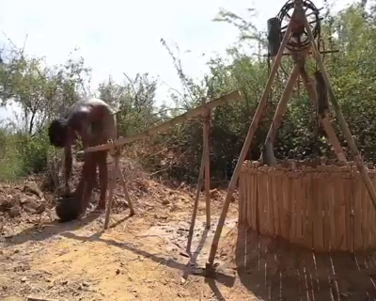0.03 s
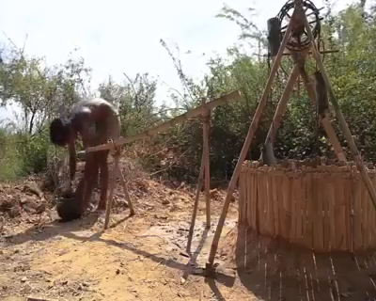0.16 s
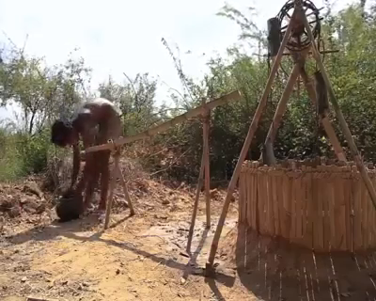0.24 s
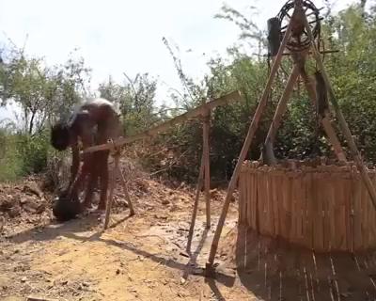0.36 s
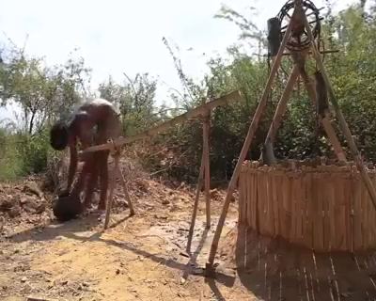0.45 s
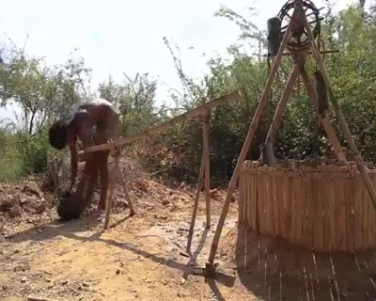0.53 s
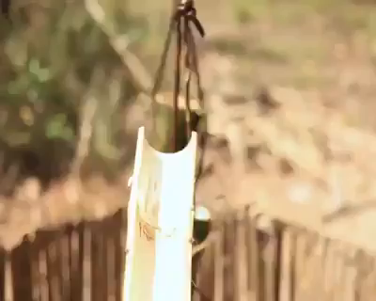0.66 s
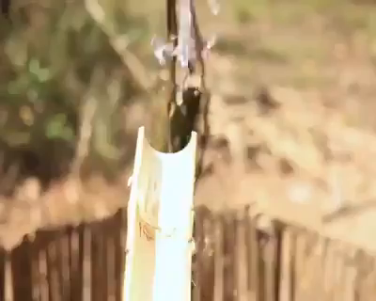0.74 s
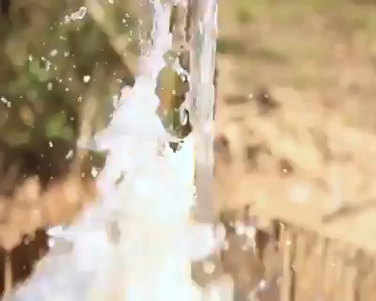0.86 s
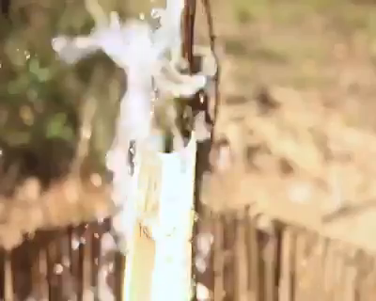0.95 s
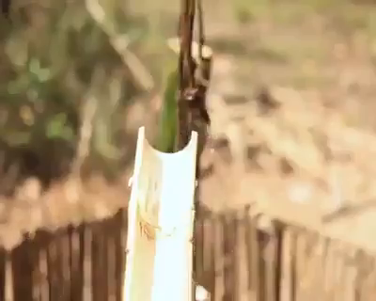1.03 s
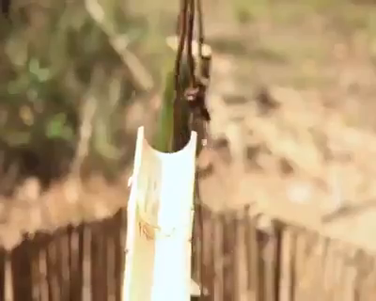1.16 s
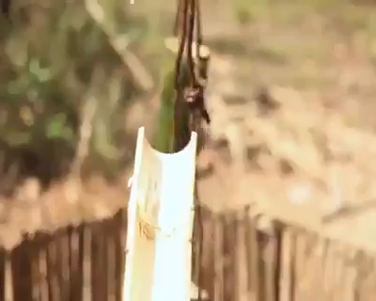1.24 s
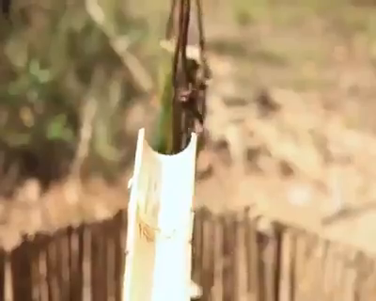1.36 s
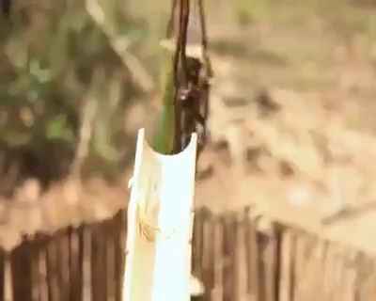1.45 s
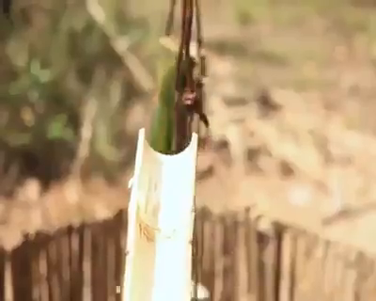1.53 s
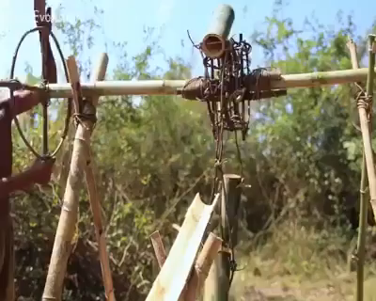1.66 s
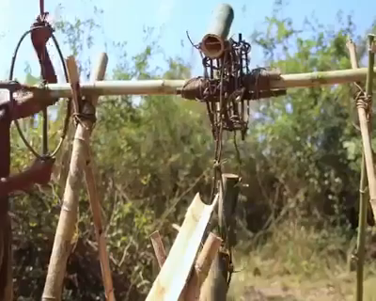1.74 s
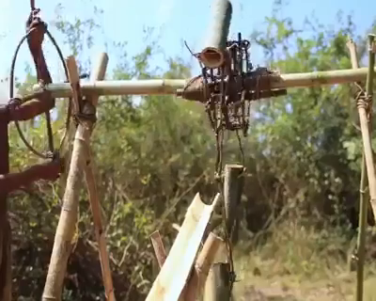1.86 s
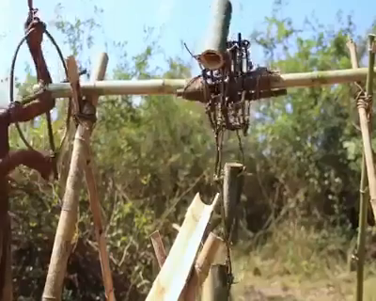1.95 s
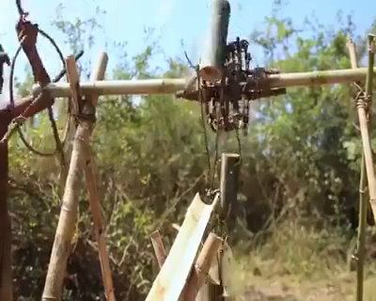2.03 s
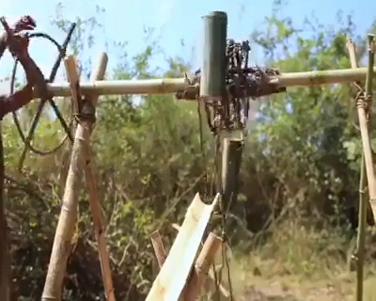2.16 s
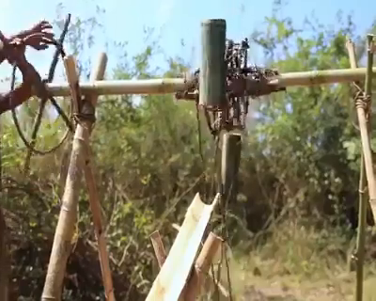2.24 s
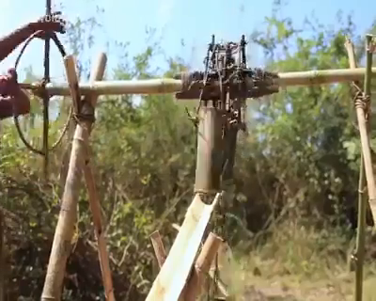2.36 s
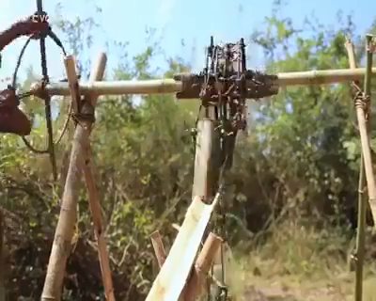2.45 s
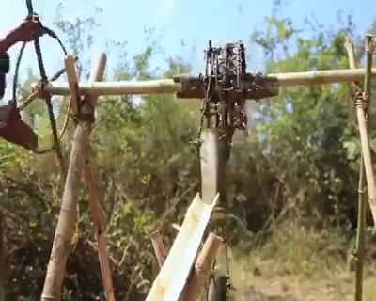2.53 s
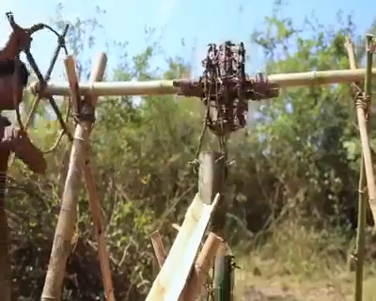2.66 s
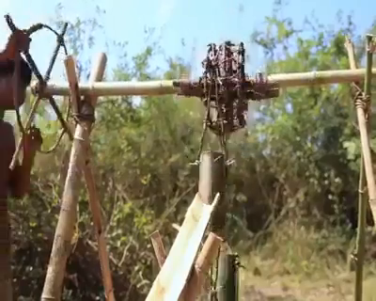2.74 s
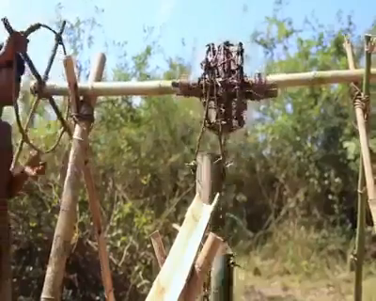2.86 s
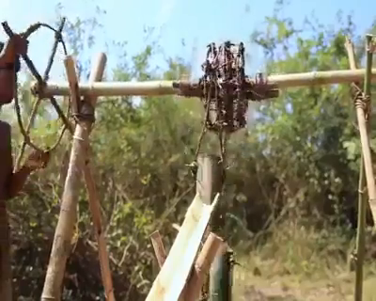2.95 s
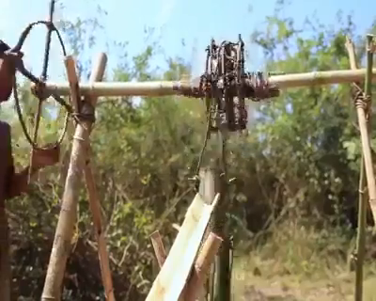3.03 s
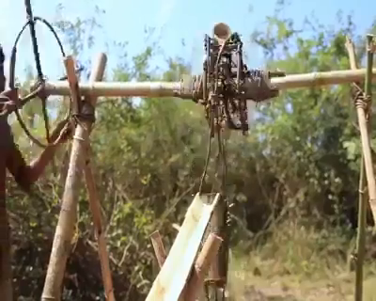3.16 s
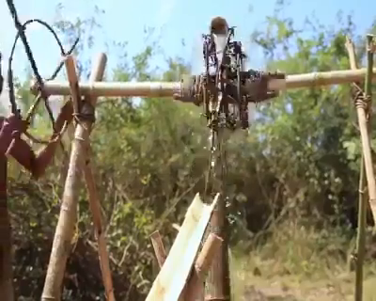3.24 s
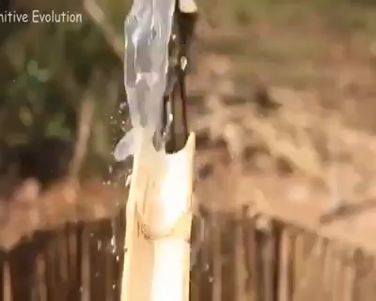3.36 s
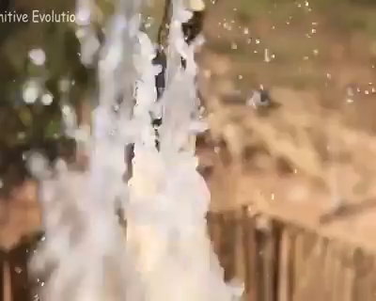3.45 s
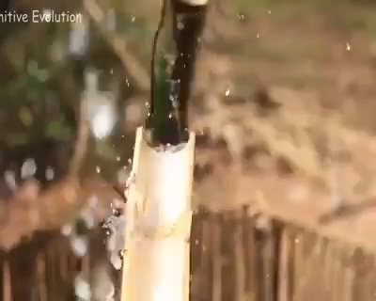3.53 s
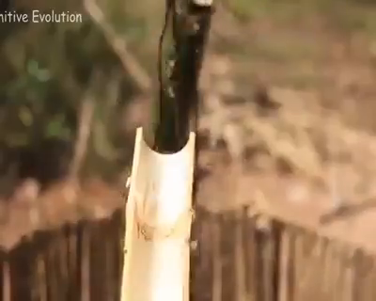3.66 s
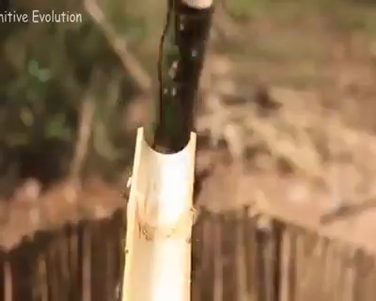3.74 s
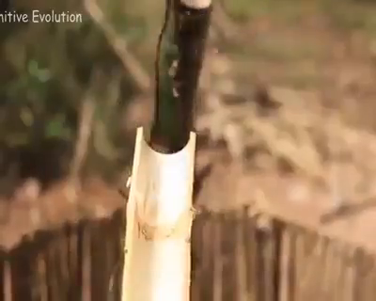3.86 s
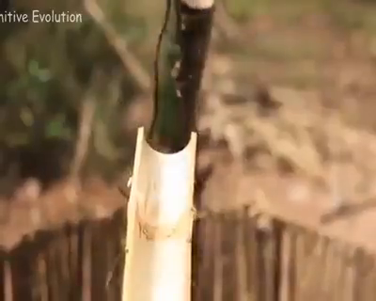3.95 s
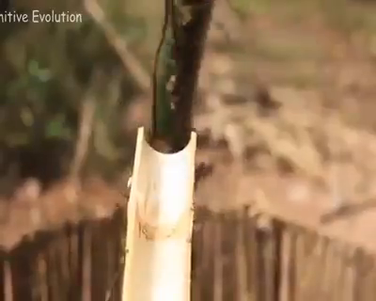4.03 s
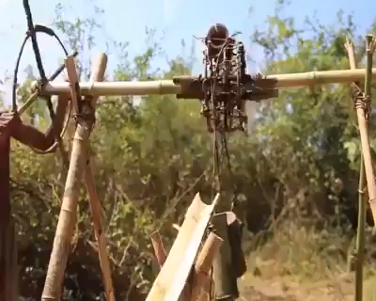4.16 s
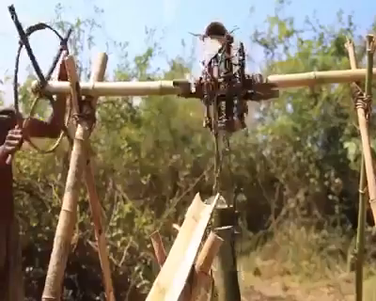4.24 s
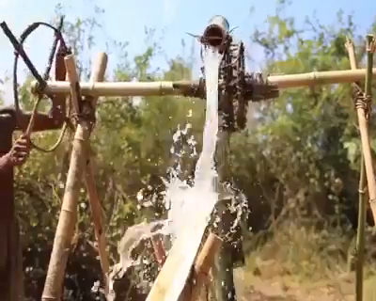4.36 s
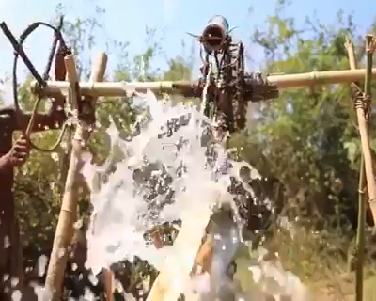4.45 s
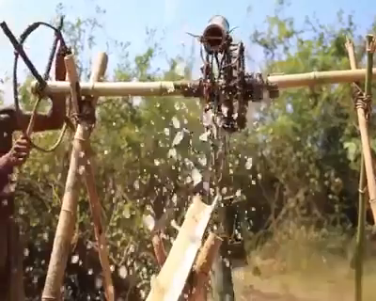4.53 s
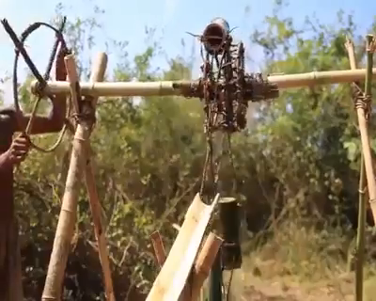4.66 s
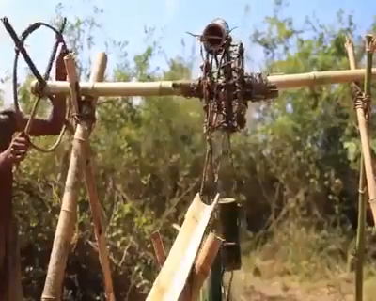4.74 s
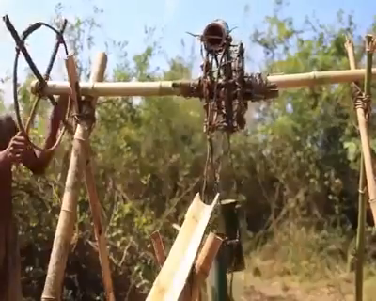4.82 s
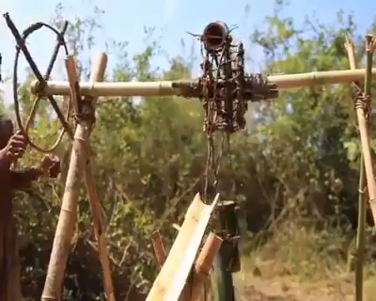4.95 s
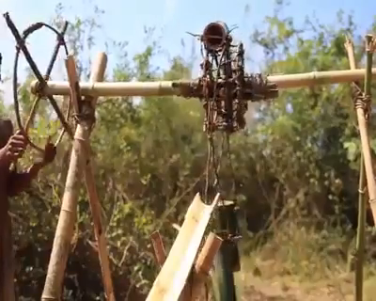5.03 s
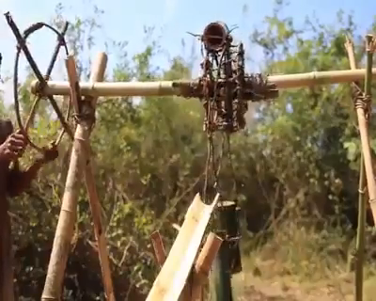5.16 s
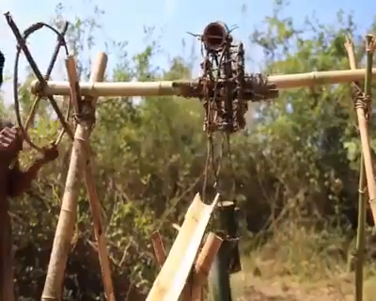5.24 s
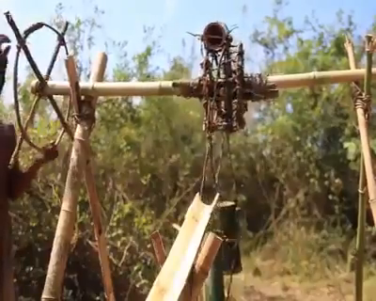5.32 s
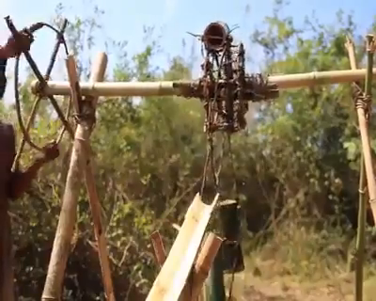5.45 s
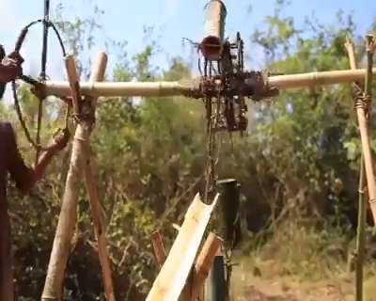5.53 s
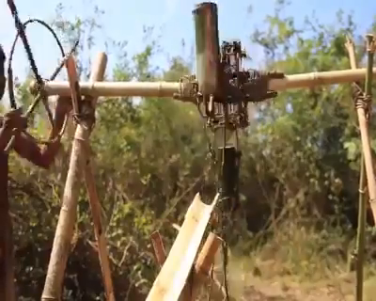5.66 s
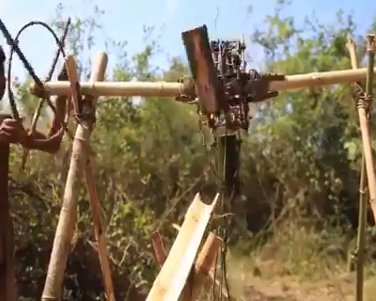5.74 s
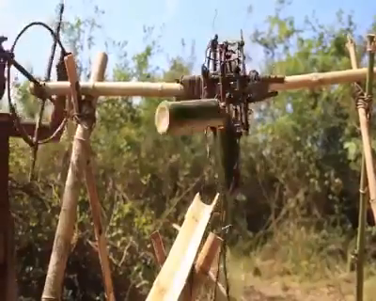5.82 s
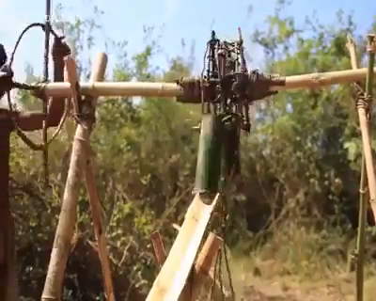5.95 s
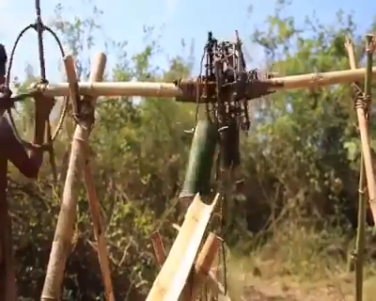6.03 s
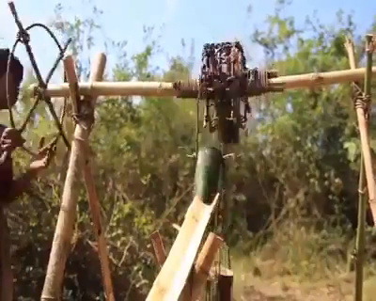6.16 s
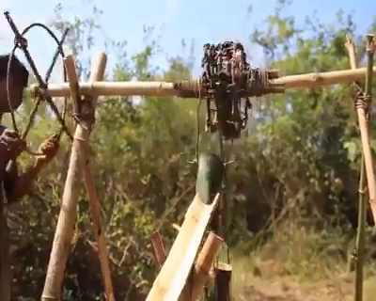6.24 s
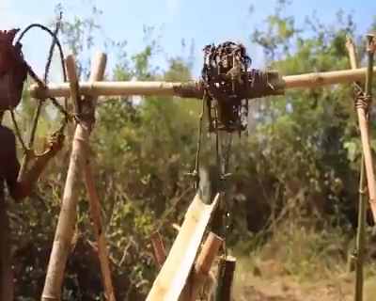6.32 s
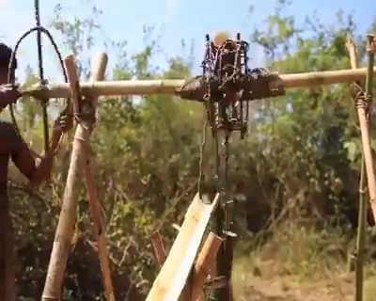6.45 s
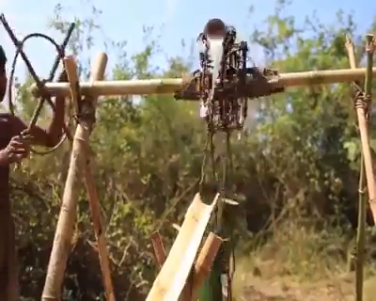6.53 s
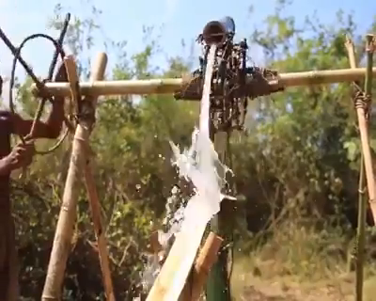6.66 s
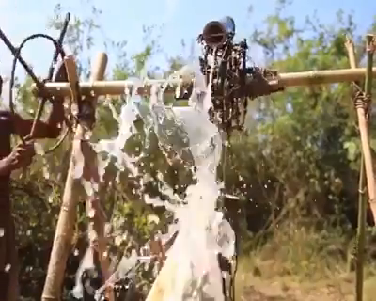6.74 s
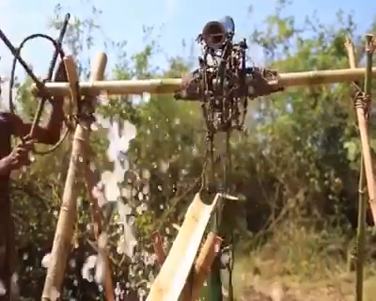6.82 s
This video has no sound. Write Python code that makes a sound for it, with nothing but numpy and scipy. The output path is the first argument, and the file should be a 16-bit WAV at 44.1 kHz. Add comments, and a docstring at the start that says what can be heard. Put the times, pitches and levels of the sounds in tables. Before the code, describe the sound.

Outdoors, over a very faint bush hiss, rope lashings creak in quick dry rasps on a bamboo wheel. Bucketloads then burst into a split-bamboo trough with bright spray, woody patter and hollow low thumps. Creaks and dripping fill the pauses; harder splashes follow mid-way, then a quiet spell and a final heavy gush. Close, dry, single-channel microphone.

```python
"""Bamboo bucket chain and trough

A hand-cranked chain of bamboo buckets tips water into a split-bamboo trough, out of doors. Loads burst into
spray (coloured droplet noise and pings), patter on bamboo (resonant noise) and boom in the hollow trough (noise
and gulps). Splats, thumps and gliding bubbles are timed transients; struck or rubbed modes make the knocks and
creaks, decaying sines the squeaks, and band-limited noise the hiss of the bush and a low bass rumble and throb
that swell and fade through the scene."""
import sys
import numpy as np
from scipy import signal
from scipy.io import wavfile

SR = 44100
rng = np.random.default_rng(int(sys.argv[2]) if len(sys.argv) > 2 else 0)


def transcribe(u):
    """Save the signal u as a 16-bit wav file named by the first command-line argument.

    u: samples, shape (n,) or (channels, n), limited to [-1, 1]; the rate is SR.
    q: integer samples, one column per channel.
    """
    v = np.clip(np.atleast_2d(u).T, -1, 1)
    q = np.round(v * 32767).astype(np.int16)
    wavfile.write(sys.argv[1], SR, q)


N = 303849

# Spectrum of the bush's hiss. Columns: f/Hz, relative level per hertz/dB
BUSH_SPECTRUM = [(100, -17), (160, -3.5), (400, -14.5), (717, -8.5), (1080, -10.5), (1960, -11.5),
                 (3540, -16), (6000, -43.5), (8820, -16), (13500, -21), (16300, -20)]
BUSH_DB = -66.5
# Low bass rumble and throb, swelling and fading through the scene. Columns: t/s, rumble level/dB, throb
# level/dB
LOW_BASS_LEVELS = [(0.0, -55, -57), (0.13, -67, -69), (0.42, -53.5, -60), (0.92, -71, -62),
                   (1.42, -67, -59), (1.61, -66, -52), (1.73, -74, -72.5), (3.26, -79, -83),
                   (3.59, -49, -49), (3.75, -84, -55), (3.82, -52, -50), (3.95, -77, -57.5),
                   (4.14, -60, -49), (4.2, -81, -71), (4.44, -89, -86.5), (4.59, -65.5, -71.5),
                   (4.66, -76, -71), (6.31, -70, -72), (6.41, -54, -55.5), (6.72, -99, -77),
                   (6.89, -52, -55)]
# Creaks of the rope lashings. Columns: t/s, strength level/dB, length/s, rubbed pitch f/Hz
CREAK_EVENTS = [(.01, -41, 0.025, 3250), (0.142, -44.5, 0.032, 3080), (0.186, -38, 0.039, 3190),
                (0.224, -41, 0.057, 3120), (0.322, -37, 0.064, 3160), (0.381, -35, 0.038, 3200),
                (0.413, -32, 0.038, 3500), (0.505, -27, 0.058, 3340), (0.642, -41.5, 0.027, 3270),
                (1.789, -38.5, 0.029, 3000), (1.845, -25.5, 0.0047, 3390), (1.929, -33, 0.048, 3200),
                (1.993, -38, 0.087, 2600), (2.084, -37.5, 0.069, 2600), (3.344, -33, 0.0088, 2620),
                (3.371, -33, 0.073, 3200), (3.429, -27, 0.016, 3790), (3.959, -31.5, 0.01, 3210),
                (4.189, -34.5, 0.028, 3350), (4.243, -35, 0.008, 3640), (4.296, -44, 0.033, 2900),
                (4.319, -35.5, 0.043, 2700), (4.796, -40.5, 0.029, 3200), (4.832, -37, 0.061, 3200),
                (4.892, -42.5, 0.057, 3000), (4.932, -39, 0.025, 3260), (4.983, -37, 0.088, 3100)]
# Modes of the lashed wheel's spokes. Columns: f/Hz, relative level/dB, t60/s
SPOKE_MODES = [(2490, 0, 0.017), (2730, 5.5, 0.018), (2995, -10.5, 0.081), (3200, 3, 0.0053),
               (3606, 4.5, 0.015), (4080, 9.5, 0.035)]
# Rubbed bamboo singing on one note. Columns: t/s, level/dB, f/Hz, rubbing time/s, t60/s
SQUEAK_EVENTS = [(0.522, -40.5, 2995, 0.027, 0.12), (3.392, -39.5, 3310, 0.0085, 0.031),
                 (4.275, -43.5, 3230, .004, .07), (5.788, -56, 1076, 0.01, 0.092),
                 (5.83, -65.5, 1075, 0.061, 0.29)]
# Buckets knocking and rubbing together. Columns: t/s, strength level/dB, contact length/s
KNOCK_EVENTS = [(2.412, -55, 0.0051), (2.441, -45, 0.023), (2.466, -54.5, 0.12), (2.605, -51.5, 0.025),
                (3.33, -25, 0.015), (3.393, -47, 0.039), (4.2314, -35, 0.0069)]
# Modes of a hollow bucket. Columns: f/Hz, relative level/dB, t60/s
BUCKET_MODES = [(1096, 1.5, 0.15), (1106, -12, 0.24), (880, -8, 0.053), (1410, 5, 0.0073),
                (1790, -15.5, 0.091), (2270, -11, 0.019)]
# Knocks above this strength favour the higher modes
HARD_KNOCK_DB, BRIGHTER_DB_PER_OCTAVE_PER_DB = -52, 0.18

# Dribble beneath the loads. Columns: t/s, spray level/dB, patter level/dB, trough level/dB
DRIBBLE_LEVELS = [(0.0, -65, -64, -73), (0.69, -65.5, -62.5, -67.5), (1.2, -52, -56.5, -59.5),
                  (1.75, -58.5, -62, -62.5), (2.4, -63.5, -69, -67), (2.95, -62.5, -70.5, -69.5),
                  (3.4, -59.5, -66.5, -68), (4.75, -88, -64, -60), (5.13, -62, -70, -64),
                  (5.22, -73, -68.5, -66.5), (6.0, -60, -67, -69), (6.432, -71, -70, -67),
                  (6.89, -55, -49.5, -51.5)]
# Sheets spilling from the buckets.
# Columns: t/s of full strength, swell before it/s, hold/s, spray level/dB, patter level/dB
SHEET_SURGES = [(0.423, 0.04, 0.0074, -54.5, -57), (0.517, 0.011, 0.017, -49, -50.5),
                (0.794, 0.17, 0.028, -53, -54.5), (0.888, 0.08, 0.048, -38.5, -44),
                (0.998, 0.064, 0.028, -31, -38.5), (1.046, 0.017, 0.044, -45.5, -45.5),
                (1.12, 0.057, 0.017, -43.5, -54), (1.16, .012, 0.016, -52, -69),
                (1.405, 0.13, 0.073, -36.5, -39.5), (1.508, 0.048, 0.053, -39, -41),
                (1.627, 0.061, 0.036, -45.5, -43), (1.84, 0.39, 0.0039, -49, -82),
                (3.44, 0.0084, 0.074, -32, -40.5), (3.638, 0.38, 0.037, -39, -46),
                (3.726, 0.15, 0.013, -53, -48), (3.979, 1, 0.17, -52, -61), (4.233, 0.51, 0.11, -58, -51.5),
                (4.369, 0.0034, 0.075, -36.5, -49), (4.477, 0.04, 0.082, -42, -47.5),
                (4.593, 0.053, 0.063, -42, -48), (4.705, 0.11, 0.011, -49.5, -47),
                (4.857, 1, 0.0075, -53, -67), (4.965, 0.2, 0.013, -54.5, -84),
                (5.054, 0.036, 0.089, -55, -61.5), (6.459, 0.019, 0.03, -79, -51),
                (6.53, 0.046, 0.068, -59, -54.5), (6.67, 0.1, 0.014, -78, -45.5),
                (6.76, 0.3, 0.026, -33.5, -48), (6.885, 0.02, .02, -42, -45)]
SHEET_SWELL_DB, SHEET_FADE_DB_PER_S = 44.5, 431
# Rushes of water down the trough. Columns: t/s of full strength, swell before it/s, hold/s, level/dB
RUSH_SURGES = [(0.992, 0.31, 0.028, -43.5), (1.36, 0.095, 0.16, -55), (1.497, 0.014, 0.081, -39),
               (1.624, .02, 0.015, -44), (3.308, .012, 0.23, -64.5), (3.452, 0.057, 0.081, -47.5),
               (3.539, 0.029, 0.098, -32), (4.073, 0.021, 0.0039, -48), (4.367, 0.013, 0.07, -55.5),
               (4.546, 0.086, 0.028, -35), (4.62, 0.038, 0.087, -44), (6.5, 0.17, 0.0035, -57.5),
               (6.855, 0.012, .04, -31.5)]
RUSH_SWELL_DB, RUSH_FADE_DB_PER_S = 56, 401
# Resonances of the trough. Columns: f/Hz, width/Hz, relative level/dB
TROUGH_RESONANCES = [(117, 36.3, -15), (167.6, 10.4, 8.5), (267, 50, -12), (343.5, 53, 11), (526, 150, 5),
                     (681.6, 11, 9.5)]
# Colour of patter on bamboo. Columns: f/Hz, width/Hz, relative level/dB
WALL_RESONANCES = [(1000, 300, -1), (1780, 810, 2.5), (2600, 900, 6), (3500, 940, 6), (5660, 3200, -6)]
# Spectrum of the spray. Columns: f/Hz, relative level per hertz/dB
SPRAY_SPECTRUM = [(2350, -12.5), (4000, -11), (5460, -1.5), (6560, -9), (7380, 2.5), (9610, 0.5),
                  (12000, -7.5), (14500, -14.5), (16400, -19)]
# Treble drive of the spray, before a constant is taken off its gain. Columns: t/s, level/dB
TREBLE_DRIVE = [(0, 8.5), (1.0, 7), (2.0, 12.5), (2.7, 0), (3.6, 7.5), (4.05, 13.5), (4.4, 4), (5.0, 21),
                (5.6, -0.5), (6.89, 6.5)]
TREBLE_HZ = 11600

# Large bubbles reaching the surface. Columns: t/s, level/dB, start f/Hz, end f/Hz, length/s
BLOOP_EVENTS = [(6.515, -47.5, 186, 556, 0.031), (6.646, -33.5, 378, 528, 0.018),
                (6.655, -40.5, 1676, 1530, 0.029), (6.663, -43.5, 1190, 1350, 0.017)]
BLOOP_ROUGHNESS = 0.22
# Slugs of water and buckets thumping the trough. Columns: t/s, level/dB, strongest f/Hz, t60/s
THUMP_EVENTS = [(0.937, -34, 375, 0.039), (0.973, -29.5, 862, 0.094), (0.998, -25, 117, 0.16),
                (1.0, -18, 341, 0.072), (1.035, -40.5, 646, 0.24), (1.045, -33, 369, 0.17),
                (1.052, -34.5, 128, 0.19), (1.374, -29, 159, 0.062), (1.499, -21, 410, 0.056),
                (1.516, -22.5, 163, 0.092), (1.546, -23, 514, 0.083), (1.566, -31, 363, 0.075),
                (1.578, -25.5, 552, 0.054), (1.624, -36.5, 550, 0.13), (3.532, -30, 294, 0.077),
                (3.548, -28.5, 369, 0.1), (3.617, -14, 534, 0.034), (3.798, -17.5, 240, 0.042),
                (3.821, -29.5, 164, 0.061), (4.071, -19.5, 261, 0.022), (4.086, -27, 218, 0.039),
                (4.384, -33.5, 517, 0.089), (4.5515, -16.5, 402, 0.024), (4.5785, -6, 603, 0.034),
                (4.569, -24, 547, 0.032), (4.58, -30, 161, 0.13), (4.593, -25, 645, 0.14),
                (4.721, -30.5, 438, 0.053), (5.33, -50.5, 492, .07), (5.518, -49.5, 490, 0.068),
                (5.53, -51.5, 196, 0.09), (5.787, -51, 486, 0.075), (5.965, -49, 494, .05),
                (5.967, -44, 179, 0.12), (6.031, -51.5, 515, .06), (6.531, -34, 780, 0.071),
                (6.859, -16, 622, 0.063), (6.856, -17, 362, 0.035), (6.881, -17, 616, 0.04)]
THUMP_RISE_CYCLES, CHURN_UNDER_THUMP_DB = 0.77, -15.5
# Splats of water on hard bamboo. Columns: t/s, bright spray level/dB, body level around 3 kHz/dB
SPLAT_EVENTS = [(0.925, -44, -33), (1.078, -31, -43), (1.142, -32, -50), (1.4198, -24, -34),
                (1.46, -34, -44), (1.479, -35, -51), (1.527, -30, -41), (1.543, -29, -54),
                (1.636, -34.5, -49), (1.825, -42, -58), (1.844, -39, -42), (1.953, -43, -65),
                (2.001, -42, -79), (2.055, -27.5, -49.5), (2.1202, -34.5, -49), (2.43, -27.5, -43),
                (2.5218, -38, -37), (2.603, -47, -53), (2.804, -40, -39.5), (3.0765, -45.5, -66),
                (3.184, -71, -49), (3.438, -45, -41), (3.523, -50, -26), (3.611, -29, -30),
                (3.7562, -27.5, -39), (3.947, -37, -72), (4.229, -41, -30.5), (4.3693, -21, -47),
                (4.3827, -54, -35), (4.402, -37, -39), (4.432, -26, -40), (4.465, -41, -49),
                (4.602, -28, -59), (4.704, -30.5, -72), (4.965, -49, -65), (5.098, -34, -51.5),
                (5.3252, -72, -40), (5.447, -42, -51.5), (5.6035, -53.5, -51.5), (5.965, -51, -48),
                (6.029, -48.5, -55), (6.5306, -43, -35), (6.545, -58, -36), (6.694, -48, -41.5),
                (6.736, -40, -46), (6.757, -24.5, -34), (6.788, -44, -39), (6.8603, -36, -33.5)]
SPLAT_RISE_S, SPLAT_T60_S, SNAP_OVER_SPRAY_DB = 0.002, 0.029, 7

CUTOFF_HZ = 16450  # stopband edge of the final low-pass


def from_db(db):
    """Logarithmic level: 20 dB is a factor of ten in amplitude."""
    return 10 ** (np.asarray(db) / 20)


def rms_one(x):
    """Normalisation: the signal is scaled to unit root mean square."""
    return x / np.sqrt(np.mean(x ** 2) + 1e-20)


def level(rows):
    """Envelope: gain over time from rows of t/s, level/dB, interpolated in decibels."""
    s, db = np.transpose(rows)
    return from_db(np.interp(np.arange(N) / SR, s, db))


def drift(rate):
    """Low-passed random fluctuation: noise at every 20th sample through two poles at rate/Hz; spread 1."""
    r = np.exp(-2 * np.pi * rate * 20 / SR)
    noise = rng.standard_normal(N // 20 + 2002)
    slow = signal.lfilter([1], [1, -2 * r, r * r], noise)[2000:]  # the onset is discarded
    return np.interp(np.arange(N) / 20, np.arange(len(slow)), rms_one(slow))


def above(x, hz, order):
    """High-pass filtering; a vanishing dither keeps silent stretches fast."""
    dither = np.resize([1e-12, -1e-12], N)
    return signal.sosfilt(signal.butter(order, hz, "high", fs=SR, output="sos"), x + dither)


def band_pass(x, low_hz, high_hz, order=2):
    """Band-pass filtering between two frequencies."""
    return signal.sosfilt(signal.butter(order, [low_hz, high_hz], "band", fs=SR, output="sos"), x)


def ring(clicks, hz, t60):
    """Impulse response of a damped oscillator: a unit click starts a decaying sine of height 1."""
    r, w = from_db(-60 / (t60 * SR)), 2 * np.pi * hz / SR
    return signal.lfilter([0, np.sin(w)], [1, -2 * r * np.cos(w), r * r], clicks + 1e-18)


def resonate(x, peaks):
    """Parallel resonance: two-pole peaks summed with alternating signs; rms 1."""
    out = 0
    for k, (hz, width_hz, db) in enumerate(peaks):
        r = np.exp(-np.pi * width_hz / SR)
        a = [1, -2 * r * np.cos(2 * np.pi * hz / SR), r * r]
        peak = signal.lfilter([(1 - r * r) / 2, 0, (r * r - 1) / 2], a, x)
        out = out + (-1) ** k * from_db(db) * peak
    return rms_one(out)


def coloured(x, spectrum, patchy_db, rate):
    """Spectral shaping: bands of about 0.4 octave, each flickering independently; rms 1."""
    hz, db = np.transpose(spectrum)
    band_count = round(2.5 * np.log2(hz[-1] / hz[0]))
    edges = np.geomspace(hz[0], min(hz[-1], .45 * SR), band_count + 1)
    out = 0
    for k, (low, high) in enumerate(zip(edges, edges[1:])):
        centre_db = np.interp(np.log(low * high) / 2, np.log(hz), db)
        gain = from_db(centre_db + patchy_db * drift(rate))
        out = out + (-1) ** k * gain * band_pass(x, low, high)
    return rms_one(out)


def random_clicks(per_s, spread_db, largest):
    """Poisson-like arrivals: clicks of random sign whose excess level is exponentially distributed."""
    sizes = from_db(spread_db * np.minimum(rng.exponential(1, N), largest)) * rng.choice([-1, 1], N)
    return sizes * (rng.random(N) < per_s / SR)


def droplets(per_s, spread_db, noise_share):
    """Shot noise: random clicks of uneven size on a bed of noise; rms 1."""
    clicks = rms_one(random_clicks(per_s, spread_db, largest=5))
    return rms_one(clicks + noise_share * rng.standard_normal(N))


def bubbles(per_s, low_hz, high_hz, cycles, spread_db, count):
    """Bubble resonance: each collapse rings at one of many pitches, falling 60 dB in some cycles; rms 1."""
    clicks = random_clicks(per_s, spread_db, largest=4)
    dealt = rng.integers(0, count, N)
    pitches = np.geomspace(low_hz, high_hz, count)
    return rms_one(sum(ring(clicks * (dealt == k), hz, cycles / hz) for k, hz in enumerate(pitches)))


def struck(events, modes, strengths_db, slips, rise, first):
    """Modal excitation: a first touch and uneven slips over the contact feed each mode its own share."""
    span = SR // 5
    t, forces = np.arange(span) / SR, np.zeros((len(modes), N + span))
    sizes = rng.standard_normal((len(events), span))
    chances = rng.random((len(events), span))
    for (s, peak_db, length), size, chance, strength_db in zip(events, sizes, chances, strengths_db):
        part = np.clip(t / max(length, .002), 0, 1)
        grip = np.minimum(part / rise, 1) * np.sqrt(1 - part)
        run = size * ((chance < slips / (length * SR)) + 0.11) * grip
        force = run / np.sqrt(np.sum(run ** 2)) + first * (t == 0)
        i = round(s * SR)
        forces[:, i:i + span] += from_db(peak_db + strength_db)[:, None] * force
    return sum(from_db(db) * ring(force[:N], hz, t60) for force, (hz, db, t60) in zip(forces, modes))


def bush():
    """Broadband noise: the hiss of the bush is shaped white noise with flickering bands."""
    noise = rng.standard_normal(N)
    return from_db(BUSH_DB) * coloured(noise, BUSH_SPECTRUM, patchy_db=1.8, rate=20.0)


def low_bass():
    """Narrow-band noise: low bass swells and fades through the scene, as a rumble and a deeper throb."""
    rumble = band_pass(rng.standard_normal(N), 62.0, 118.0)
    throb = band_pass(rng.standard_normal(N), 36.0, 54.0)
    rows = np.array(LOW_BASS_LEVELS)
    lumps = from_db(1.8 * drift(2.9))
    rumbling = level(rows[:, [0, 1]]) * rms_one(lumps * rumble)
    return rumbling + level(rows[:, [0, 2]]) * rms_one(lumps * throb)


def creaks():
    """Stick-slip friction: rope slipping on bamboo rings the spokes, most those near the rubbed pitch."""
    rows, spoke_hz = np.array(CREAK_EVENTS), np.array(SPOKE_MODES)[:, 0]
    detuning = (spoke_hz - rows[:, 3:]) / 455.0
    strengths_db = rng.normal(0, 0.3, (len(rows), len(spoke_hz))) - 10.0 * detuning ** 2
    rung = struck(rows[:, :3], SPOKE_MODES, strengths_db, slips=35.0, rise=0.2, first=0)
    return above(rung, 2340.0, order=4)


def squeaks():
    """Sustained then free vibration: a note trembles while rubbed, then decays cleanly."""
    out, tremble = np.zeros(N), 0.7 * drift(80.0)
    for s, peak_db, hz, rubbed, t60 in SQUEAK_EVENTS:
        i, t = round(s * SR), np.arange(SR // 3) / SR
        swell = np.minimum(t / 0.0025, 1) * (1 + tremble[i:i + len(t)] * (t < rubbed))
        decay = from_db(peak_db - 60 * np.maximum(t - rubbed, 0) / t60)
        out[i:i + len(t)] += swell * decay * np.sin(2 * np.pi * hz * t)
    return out


def knocks():
    """Modal impact: hollow buckets ring near 1.1 kHz without bass; harder knocks favour higher modes."""
    octaves = np.log2(np.array(BUCKET_MODES)[:, 0] / BUCKET_MODES[0][0])
    hardness = np.maximum(np.array(KNOCK_EVENTS)[:, 1:2] - HARD_KNOCK_DB, 0)
    chance_db = rng.normal(0, 1.0, (len(KNOCK_EVENTS), len(BUCKET_MODES)))
    strengths_db = chance_db + BRIGHTER_DB_PER_OCTAVE_PER_DB * hardness * octaves
    rung = struck(KNOCK_EVENTS, BUCKET_MODES, strengths_db, slips=25.0, rise=0.047, first=0.57)
    return above(rung, 880.0, order=4)


def surges(s, swell, hold, db, swell_db, fade_db_per_s):
    """Exponential growth and decay: each surge climbs swell_db, holds, then fades at a steady rate."""
    out = np.zeros(N)
    for full, rise, stay, top_db in zip(s, np.maximum(swell, .002), hold, db):
        i = max(round((full - 3 * rise) * SR), 0)  # the climb begins early enough to start faint
        t = np.arange(i, min(round((full + stay + .5) * SR), N)) / SR - full
        climb_db = swell_db * np.minimum(t / rise, 0)
        fade_db = fade_db_per_s * np.maximum(t - stay, 0)
        out[i:i + len(t)] += from_db(top_db + climb_db - fade_db)
    return out


def flows():
    """Superposition of flow: gains of spray, patter and trough, as surges over the dribble."""
    s, swell, hold, spray_db, patter_db = np.transpose(SHEET_SURGES)
    spray = surges(s, swell, hold, spray_db, SHEET_SWELL_DB, SHEET_FADE_DB_PER_S)
    patter = surges(s, swell, hold, patter_db, SHEET_SWELL_DB, SHEET_FADE_DB_PER_S)
    trough = surges(*np.transpose(RUSH_SURGES), RUSH_SWELL_DB, RUSH_FADE_DB_PER_S)
    rows = np.array(DRIBBLE_LEVELS)
    return [gain + level(rows[:, [0, k]]) for k, gain in enumerate((spray, patter, trough), 1)]


def trough_churn():
    """Cavity resonance: noise through the trough's resonances, with low bubble gulps, band-limited."""
    gulps = bubbles(per_s=140., low_hz=155.3, high_hz=747.0, cycles=26.0, spread_db=3.5, count=8)
    churn = rms_one(resonate(rng.standard_normal(N), TROUGH_RESONANCES) + 0.77 * gulps)
    return band_pass(churn, 118.0, 790.0, order=4)


def wall_body():
    """Forced resonance: droplet impacts take the colour of the bamboo wall."""
    return resonate(droplets(per_s=1200.0, spread_db=3.5, noise_share=0.8), WALL_RESONANCES)


def patter_texture(body):
    """Clustered impacts: wall noise and ringing drops land in uneven flurries."""
    drops = bubbles(per_s=250.0, low_hz=800.0, high_hz=6000., cycles=30.0, spread_db=3.0, count=12)
    flurries = rms_one(from_db(2.5 * drift(45.)))
    return flurries * rms_one(body + 0.35 * drops)


def bright_spray():
    """Shot noise with bubble resonance: coloured droplets and pinging fine drops, with varying treble."""
    grain = droplets(per_s=4000., spread_db=2.5, noise_share=0.8)
    bright = coloured(grain, SPRAY_SPECTRUM, patchy_db=3.5, rate=37.0)
    pings = bubbles(per_s=900.0, low_hz=3000., high_hz=12300.0, cycles=100.0, spread_db=3.5, count=16)
    bright = rms_one(bright + 0.26 * pings)
    high_pass = signal.butter(2, TREBLE_HZ, "high", fs=SR, output="sos")
    treble = signal.sosfiltfilt(high_pass, bright)  # zero phase, so it adds in step
    return bright + (level(TREBLE_DRIVE) - 3.0) * treble


def bloops():
    """Frequency glide: a sine with linearly changing pitch under a rounded, trembling swell."""
    out = np.zeros(N)
    for s, peak_db, start_hz, end_hz, length in BLOOP_EVENTS:
        i, t = round(s * SR), np.arange(round(length * SR)) / SR
        turns = start_hz * t + (end_hz - start_hz) * t ** 2 / (2 * length)
        swell = np.sqrt(np.sin(np.pi * t / length))
        out[i:i + len(t)] += from_db(peak_db) * swell * np.sin(2 * np.pi * turns)
    return out * (1 + BLOOP_ROUGHNESS * drift(180.0))


def thumps(churn):
    """Impulsive cavity excitation: a blow cracks, rings the air under the slug and shakes the churn."""
    slugs, shaken = np.zeros(N), np.zeros(N)
    for s, peak_db, hz, t60 in THUMP_EVENTS:
        i = round(s * SR)
        t = np.arange(min(N - i, SR // 3)) / SR
        blow = from_db(peak_db) * (1 - np.exp(-(t * hz / THUMP_RISE_CYCLES) ** 2))
        tone = np.sin(2 * np.pi * hz * t) * from_db(-60 * t / t60)
        # the shorter the ring, the harder the crack
        crack = 0.027 / t60 * np.sin(2 * np.pi * 1.926 * hz * t) * np.exp(-t / 0.0016)
        slugs[i:i + len(t)] += blow * (tone + crack)
        shaken[i:i + len(t)] += blow * from_db(CHURN_UNDER_THUMP_DB - 60 * t / (1.15 * t60))
    return above(slugs, 67.0, order=3) + shaken * churn


def splats(bright, body):
    """Impact transient: a snap near the onset, with spray and wall noise rising at once and dying fast."""
    high, low, snaps = np.zeros(N), np.zeros(N), np.zeros((2, N))
    for s, peak_db, body_db in SPLAT_EVENTS:
        i = round(s * SR)
        t = np.arange(min(N - i, SR // 4)) / SR
        fall = np.minimum(t / SPLAT_RISE_S, 1) * from_db(-60 * t / SPLAT_T60_S)
        # each noise is levelled by its own spread over the first 20 ms
        high[i:i + len(t)] += from_db(peak_db) / bright[i:i + SR // 50].std() * fall
        low[i:i + len(t)] += from_db(body_db) / body[i:i + SR // 50].std() * fall
        snaps[:, i + round(.001 * SR)] = from_db(np.add([peak_db, body_db], SNAP_OVER_SPRAY_DB))
    snapping = ring(snaps[0], 9600.0, 0.00115) + ring(snaps[1], 3370.0, 0.0024)
    return high * bright + low * body + snapping


def scene():
    """Superposition: bush, low bass, bamboo and water add in one channel."""
    background = bush() + low_bass()
    bamboo = creaks() + squeaks() + knocks()
    spraying, pattering, rushing = flows()
    churn, body, bright = trough_churn(), wall_body(), bright_spray()
    clumps = from_db(1.8 * drift(60.0))  # the sheet of water tears into clumps
    spray = spraying * clumps * bright
    patter = pattering * patter_texture(body)
    water = rushing * churn + patter + spray + bloops() + thumps(churn) + splats(bright, body)
    return (background + bamboo + water)[None]


def record(dry):
    """Low-pass filtering: a steep cut leaves the top at least 60 dB down beyond the stopband edge."""
    return signal.sosfilt(signal.cheby2(14, 60, CUTOFF_HZ, fs=SR, output="sos"), dry)


dry = scene()
out = record(dry)
transcribe(out)
```